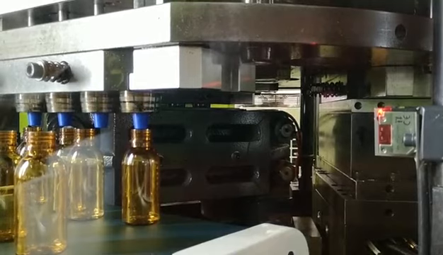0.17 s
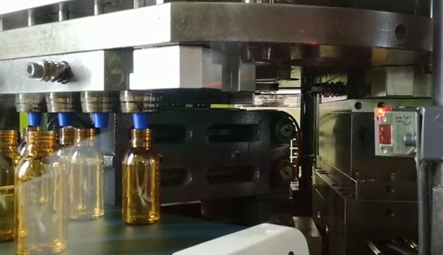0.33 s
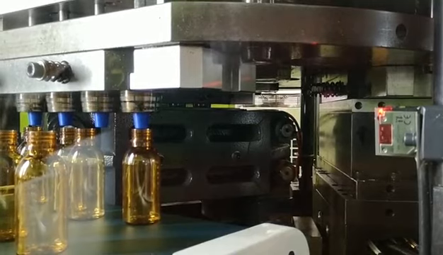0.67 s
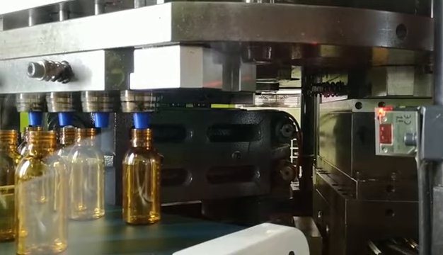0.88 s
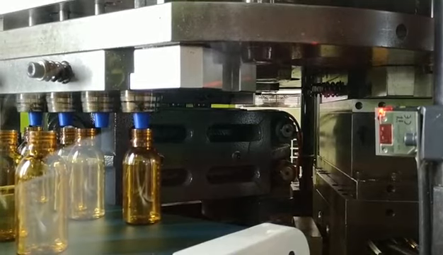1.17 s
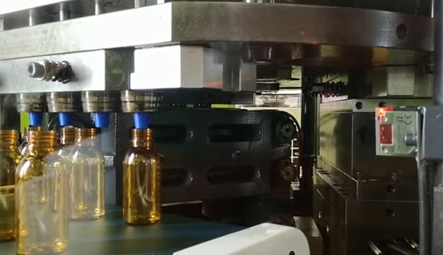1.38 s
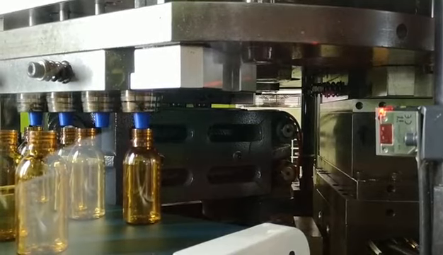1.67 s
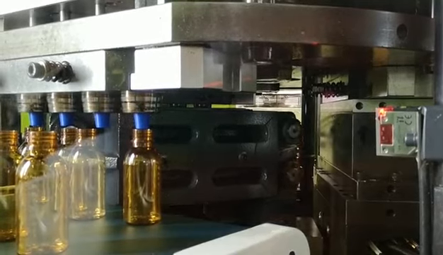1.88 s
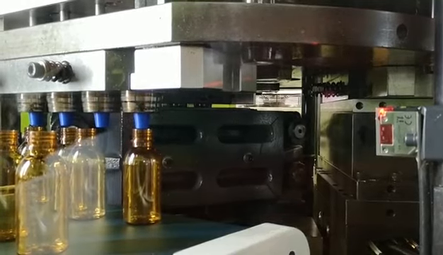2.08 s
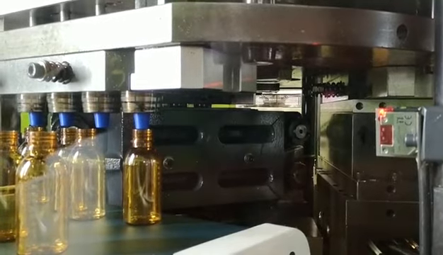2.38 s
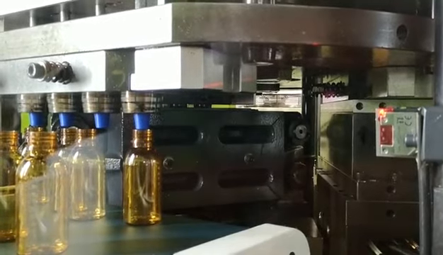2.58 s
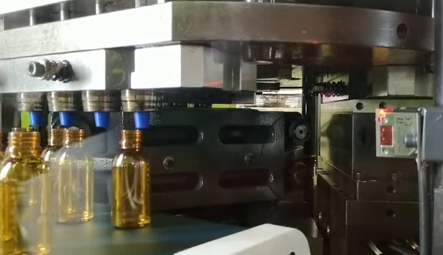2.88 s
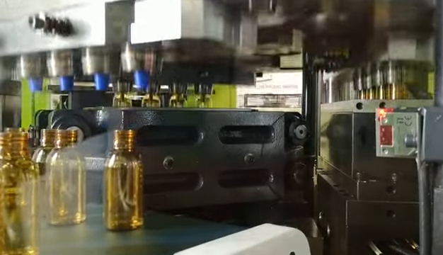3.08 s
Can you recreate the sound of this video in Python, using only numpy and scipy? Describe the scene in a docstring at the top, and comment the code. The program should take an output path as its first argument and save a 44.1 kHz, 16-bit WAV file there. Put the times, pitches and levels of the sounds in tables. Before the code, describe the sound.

Moulding machine cycling: opening air hiss, a lull, then heavy low thuds, steel clanks and pump hum.

```python
"""A moulding machine at work: its heavy frame shudders in low thuds, steel parts clank shut, valves vent air
through pipes and a pump hums, over thin motor tones and the steady roar of a factory hall.
Thuds, clanks and vents are bursts of noise coloured by resonances; pump and motors are sines;
the roar is shaped noise. Two spaced microphone ports hear it, alike in the bass and unlike above."""
import sys
import numpy as np
from scipy import signal
from scipy.fft import irfft
from scipy.io import wavfile
from scipy.ndimage import uniform_filter1d

SR = 44100
rng = np.random.default_rng(int(sys.argv[2]) if len(sys.argv) > 2 else 0)


def boost_factor(decibels):
    """Convert a level in decibels to a linear amplitude factor."""
    exponent = np.asarray(decibels, float) / 20
    return 10 ** exponent


def transcribe(signal):
    """Save signal, clipped to [-1, 1], as a 16-bit WAV file at the path in sys.argv[1]."""
    frames = np.atleast_2d(signal).T
    limited = np.clip(frames, -1, 1)
    pcm = np.round(limited * 32767).astype(np.int16)
    wavfile.write(sys.argv[1], SR, pcm)


N = 142443

WAVER_DB, WAVER_S = 3.2, 0.022  # level waver of pump and motor tones: rms [dB], smoothing [s]


def evened(x):
    """Scales a signal to rms 1."""
    return x / np.sqrt(np.mean(x ** 2) + 1e-20)


def read(points, hz):
    """Reads a spectrum table on a log-frequency axis."""
    f, value = np.transpose(points)
    return np.interp(np.log(hz + 1), np.log(f + 1), value)


def slow(seconds):
    """Slow random wander of rms 1: white noise smoothed twice."""
    size = max(int(seconds * SR), 2)
    once = uniform_filter1d(rng.standard_normal(N), size)
    return evened(uniform_filter1d(once, size))


def ports(colour, size):
    """Coloured noise at two spaced ports, whose likeness, lag and balance vary with pitch; mid rms 1."""
    # Likeness of the ports: (frequency [Hz], left-right correlation [0-1])
    likeness = [(60, .995), (170, .95), (260, .87), (345, .74), (430, .48), (500, .35), (600, .58),
                (700, .52), (790, .2), (1000, .35), (1300, .2), (1750, .35), (2300, .3), (3000, .2),
                (7000, .15)]
    # Phase between the ports: (frequency [Hz], lag of left behind right [rad])
    left_lag = [(100, 0), (170, .1), (345, .6), (430, .8), (520, 2.4), (600, 3), (700, 3), (860, .7),
                (1030, 0), (1700, 2.3), (2300, .8), (7000, 0)]
    # Balance of the ports: (frequency [Hz], left over right [dB])
    balance = [(100, 0), (500, -.5), (800, 1.5), (1400, 0), (2050, -2), (2350, -5.5), (2700, -4),
               (3200, -7), (4000, -9.5), (4200, -12.5), (4900, -10.5), (5700, -7), (6200, -4), (7400, -2.5)]
    hz = np.fft.rfftfreq(size, 1 / SR)
    a, b, c, d = rng.standard_normal((4, len(hz)))
    same = np.clip(read(likeness, hz), 0, 1)
    lean = boost_factor(read(balance, hz) / 2)
    left = a + 1j * b
    shared = same * np.exp(1j * read(left_lag, hz)) * left
    right = shared + np.sqrt(1 - same ** 2) * (c + 1j * d)
    # The balance leaves the summed power of the two ports unchanged
    spectrum = colour(hz) / np.sqrt(lean ** 2 + lean ** -2)
    x = irfft(np.array([lean * left, right / lean]) * spectrum, size)
    return x / np.sqrt(np.mean(x.mean(0) ** 2))


def burst(start, rise, hold, t60, db, centre_hz, octaves, modes):
    """Noise in a band, coloured by resonances, that rises, holds and dies away exponentially."""
    def colour(hz):
        peaks = sum(boost_factor(2 * p) / (1 + (2 * (hz - f) / w) ** 2) for f, w, p in modes)
        band = np.exp(-.5 * (np.log2((hz + 1) / centre_hz) / octaves) ** 2)
        return np.sqrt((1 + peaks) / (hz + 20)) * band

    size = 2 ** 15
    noise = np.tile(ports(colour, size), (1, N // size + 1))[:, :N]
    t = np.arange(N) / SR - start
    fade_db = -60 * np.maximum(t - rise - hold, 0) / t60
    flutter_db = 1.5 * slow(0.006)  # uneven flow and rattle
    shape = np.clip(t / rise, 0, 1) * boost_factor(flutter_db + fade_db)
    # The level refers to the noise over rise and hold, ahead of its envelope
    held = (t >= 0) & (t < rise + hold)
    return boost_factor(db) * shape * noise / np.sqrt(np.mean(noise.mean(0)[held] ** 2))


def shudders():
    """The heavy frame shaking on its low bending modes, one mode leading each time."""
    # Shakes: (start [s], hold [s], noise level [dB], leading mode and band centre [Hz], breadth [octaves])
    shakes = [(0, .04, -18.5, 100, 1), (0.123, 0.16, -24, 79, 0.61), (0.278, 0.024, -21.5, 159, 0.16),
              (1.431, 0.055, -25.5, 156, 0.9), (1.492, 0.074, -20, 105, 0.91),
              (1.549, 0.082, -13.5, 105, 0.59), (1.56, 0.14, -29.5, 36, 1), (1.656, 0.12, -22, 176.4, 0.2),
              (1.732, 0.036, -8, 154, 0.71), (1.78, 0.11, -12.5, 125.2, .6), (1.879, 0.072, -15, 103, .7),
              (1.979, .1, -19.5, 121, 0.32), (2.12, 0.027, -17, 77, 0.3), (2.282, 0.11, -14.5, 180, 1),
              (2.376, 0.052, -17, 164.5, 0.15), (2.498, .065, -11.5, 79.8, 0.47),
              (2.499, 0.024, -19, 278, 0.48), (2.529, 0.025, -15, 220.4, 0.75),
              (2.589, 0.058, -13.5, 84.7, 1), (2.78, 0.078, -25.5, 82, 0.98)]
    # Modes of the frame: (frequency [Hz], width [Hz], height over the plain noise [dB])
    frame_modes = [(45, 12, -1.5), (77, 3.3, 11.5), (105, 8.7, -0.5), (121, 3.3, 8.5), (162.2, 17, 11.5),
                   (180, 4, 7.5), (190, 36, 6), (251.4, 13, 12)]
    mix = 0
    for start, hold, db, hz, octaves in shakes:
        leading = (hz, 8, 14)  # as in the mode table
        mix = mix + burst(start, 0.01, hold, 0.12, db, hz, octaves, frame_modes + [leading])
    return mix


def clanks():
    """Steel parts rattling shut: short noise through the ringing modes of the steel."""
    # Blows: (start [s], rattle [s], noise level [dB], band centre [Hz], breadth [octaves], loudest ring [Hz])
    blows = [(1.998, .045, -23, 493, 1.3, 382), (2.279, 0.016, -18, 454, 2, 274),
             (2.47, 0.0075, -30, 916, 0.43, 890), (2.492, 0.016, -17, 1620, 1.15, 428),
             (2.735, 0.012, -29, 1300, 1.5, 890), (3.18, 0.039, -26.5, 904, 2.2, 590),
             (3.21, .02, -20.5, 2230, 0.28, 2300)]
    # Modes of the steel: (frequency [Hz], width [Hz], height over the plain noise [dB])
    steel_modes = [(260, 40, 7), (425, 25, 8), (555, 20, 10), (800, 45, 7), (915, 40, 9), (1060, 60, 9),
                   (1330, 40, 6), (1770, 80, 9), (2070, 45, 10), (2280, 30, 6), (2620, 50, 9),
                   (3200, 45, 4), (3830, 90, 5)]
    mix = 0
    for start, rattle, db, hz, octaves, ring_hz in blows:
        loudest = (ring_hz, 44, 13)  # as in the mode table
        mix = mix + burst(start, 0.011, rattle, 0.24, db, hz, octaves, steel_modes + [loudest])
    return mix


def vents():
    """Valves venting air: turbulent hiss coloured by the resonances of the pipes."""
    # Puffs: (start [s], hold [s], fade by 60 dB [s], noise level [dB], band centre [Hz],
    # breadth [octaves], loudest pipe [Hz], its height over the hiss [dB])
    puffs = [(0, 0.013, 0.36, -20.5, 2500, 0.34, 2300, 8), (0, 0.2, 0.33, -24, 4770, 1.05, 3870, 4.5),
             (0.101, 0.049, 0.15, -29, 2200, 0.26, 2215, 9), (0.139, .015, 0.27, -17, 2300, 0.57, 1834, 15),
             (0.176, 0.067, 0.24, -28, 1800, 0.63, 1510, 3.5),
             (1.459, 0.012, .5, -24.5, 3200, 1.3, 2770, 15),
             (1.461, 0.038, 0.32, -33.5, 6120, 0.23, 5730, 12.5),
             (1.724, 0.017, 0.23, -31, 4110, 0.76, 4430, 12.5),
             (1.776, .02, 0.39, -36.5, 3910, 0.66, 3830, 10),
             (1.915, 0.018, 0.9, -38.5, 3070, 0.76, 2300, -3.5),
             (2.468, 0.021, 0.42, -28, 4600, 0.34, 4650, 6), (2.526, 0.05, 0.32, -33.5, 5000, 1.2, 5490, 5),
             (2.734, .02, .3, -40, 4520, 0.6, 5600, 15.5), (2.751, 0.072, .2, -38.5, 3640, 0.091, 3920, 13),
             (3.163, .06, .3, -40, 5640, 0.57, 5400, 1)]
    # Pipe resonances: (frequency [Hz], width [Hz], height over the hiss [dB])
    pipe_modes = [(2020, 74, 11), (2300, 60, 8.5), (2580, 67, 8.5), (3200, 100, 0), (3720, 250, 4),
                  (5160, 120, 7.5), (6070, 100, -0.5)]
    rise = 0.014  # [s]
    mix = 0
    for start, hold, t60, db, hz, octaves, pipe_hz, pipe_db in puffs:
        if start == 0:
            start = -rise  # already open as the scene begins
        loudest = (pipe_hz, 90, pipe_db)
        mix = mix + burst(start, rise, hold, t60, db, hz, octaves, pipe_modes + [loudest])
    return mix


def pump():
    """A wavering hum with two lower orders, louder under load while its speed sags."""
    # Hum level: (time [s], rms level ahead of order offset and waver [dB])
    hum_level = [(0, -39.5), (0.602, -62), (1.6, -33.5), (2.0, -43.5), (2.598, -39.5), (2.7, -25.5),
                 (2.82, -26.5), (2.85, -37), (2.9, -22), (3.15, -29.5), (3.23, -24.5)]
    # Orders of the hum: (multiple of the speed, level offset [dB])
    orders = [(1 / 4, -5), (1 / 2, -7), (1, 0)]
    # Speed, sagging under load: (time [s], speed [Hz])
    speed = [(0, 300.2), (2.55, 300.2), (2.68, 282), (2.74, 297), (2.95, 298.5), (3.23, 296)]
    t = np.arange(N) / SR
    turns = np.cumsum(np.interp(t, *np.transpose(speed))) / SR
    lag = np.array([[0.7], [0]])  # left lags right [rad at order 1]
    tone = 0
    for multiple, db in orders:
        phase = 2 * np.pi * (multiple * turns + rng.random()) - multiple * lag
        tone = tone + boost_factor(db + WAVER_DB * slow(WAVER_S)) * np.sin(phase)
    return np.sqrt(2) * boost_factor(np.interp(t, *np.transpose(hum_level))) * tone


def whines():
    """Thin motor tones of steady pitch, wavering in level apart at each port."""
    # Levels, one row a tone: (left rms ahead of the waver [dB], right rms ahead of the waver [dB])
    tone_levels = [(-48, -47), (-60, -56), (-57, -58)]
    # Pitch of each motor tone: [Hz]
    tone_pitches = [883.4, 2584.6, 5170.2]
    t = np.arange(N) / SR
    mix = np.zeros((2, N))
    for hz, levels in zip(tone_pitches, tone_levels):
        for port, db in enumerate(levels):
            tone = np.sin(2 * np.pi * (hz * t + rng.random()))
            mix[port] += np.sqrt(2) * boost_factor(db + WAVER_DB * slow(WAVER_S)) * tone
    return mix


def hall():
    """The roar of the whole hall: shaped noise, swelling a little, with drifting patches of colour."""
    # Spectrum of the roar: (frequency [Hz], relative density [dB per Hz])
    roar_spectrum = [(18, -44), (30, -11.5), (44, 3.5), (66, -6), (97, 2.5), (119, -1.5), (150, -3.5),
                     (169, -3.5), (208, -1.5), (267, -4), (300, -2.5), (329, -7), (430, -10.5),
                     (520, -12.5), (620, -12.5), (720, -13), (866, -13), (1000, -15), (1610, -15.5),
                     (2170, -16.5), (2900, -21.5), (4340, -28.5), (5100, -29.5), (6200, -36), (7370, -41.5),
                     (9580, -68)]
    patch_db, patch_hz, patch_s = 2.2, 250, 0.09  # rms depth, breadth and length of the patches
    roar = ports(lambda hz: boost_factor(read(roar_spectrum, hz)), 2 ** 18)[:, :N]
    hz, _, z = signal.stft(roar, SR, nperseg=1024, noverlap=768)
    patches = rng.standard_normal(z.shape[1:])
    patches = uniform_filter1d(patches, size=max(int(patch_hz / hz[1]), 1), axis=0)
    patches = evened(uniform_filter1d(patches, size=max(int(patch_s * SR / 256), 1), axis=1))
    roar = signal.istft(z * boost_factor(patch_db * patches), SR, nperseg=1024, noverlap=768)[1][:, :N]
    swell_db = -0.61 * slow(0.12)
    return boost_factor(-24.5 + swell_db) * roar


def scene():
    """Sums the machine, its motors and the hall."""
    return shudders() + clanks() + vents() + pump() + whines() + hall()


def roll_off(x):
    """The treble ends steeply here."""
    return signal.sosfilt(signal.butter(12, 7520, fs=SR, output="sos"), x)


def record(dry):
    """Mild gain control, soft overload and a steep treble limit."""
    threshold_db, squeeze, window_s = -18, 0.17, 0.059  # squeeze: dB taken off per dB over the threshold
    power = uniform_filter1d((dry ** 2).mean(0), size=max(int(window_s * SR), 2))
    power_db = 10 * np.log10(abs(power) + 1e-12)
    x = dry / boost_factor(squeeze * np.maximum(power_db - threshold_db, 0))
    ceiling = 0.95  # of full scale
    x = ceiling * np.tanh(x / ceiling)
    lowpass = signal.firwin(1023, 7560, window=("kaiser", 9), fs=SR)  # edge [Hz]
    x = signal.oaconvolve(x, lowpass[None], "same")
    return roll_off(x)


dry = scene()
out = record(dry)
transcribe(out)
```